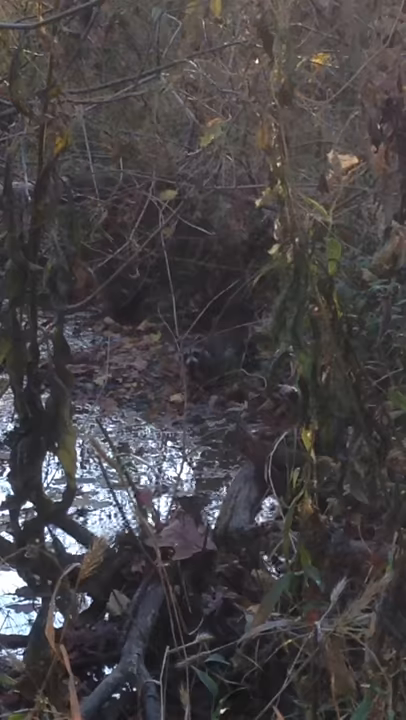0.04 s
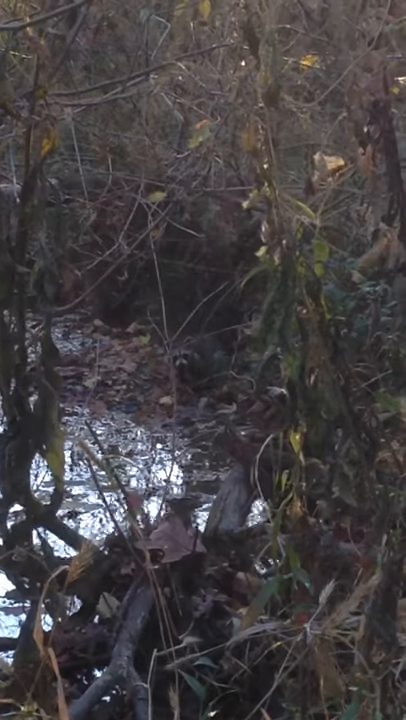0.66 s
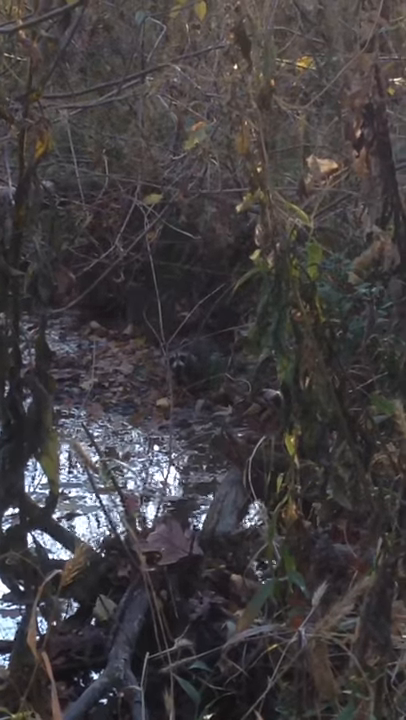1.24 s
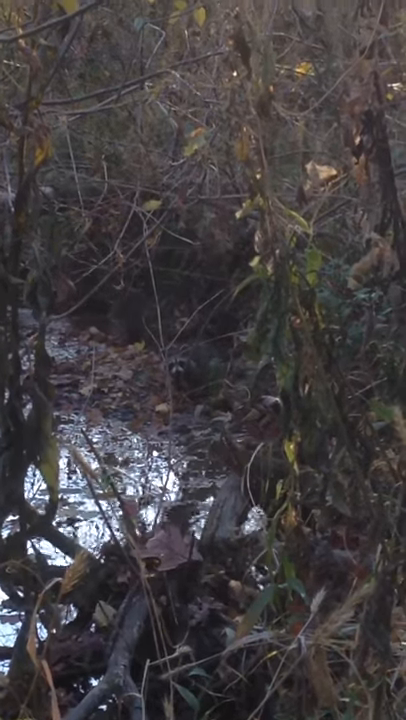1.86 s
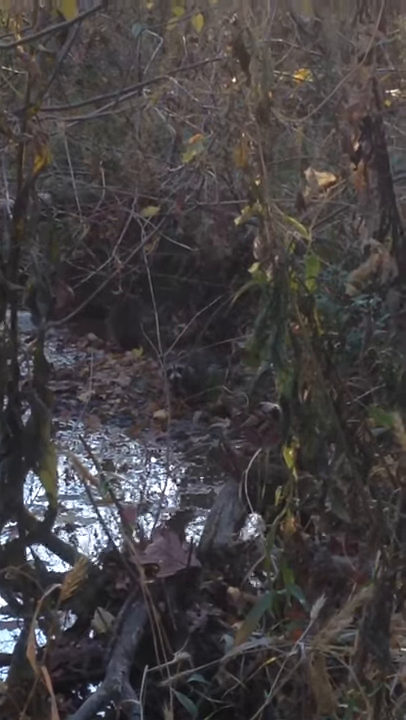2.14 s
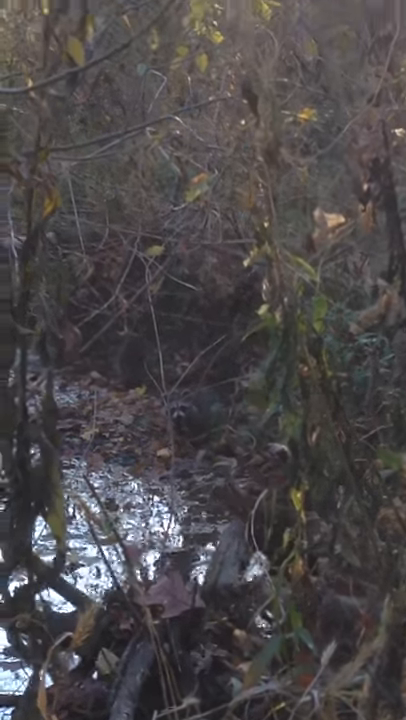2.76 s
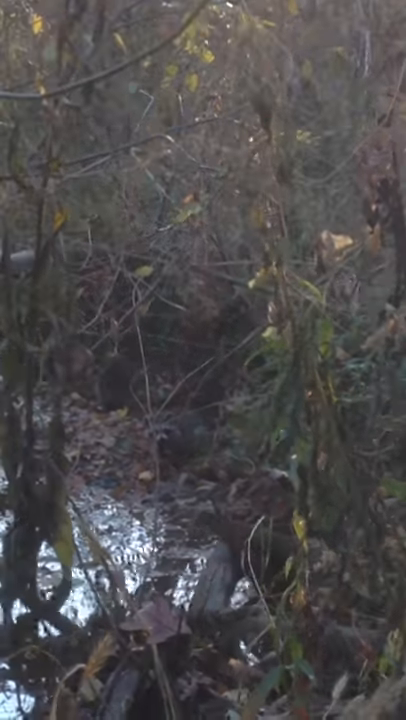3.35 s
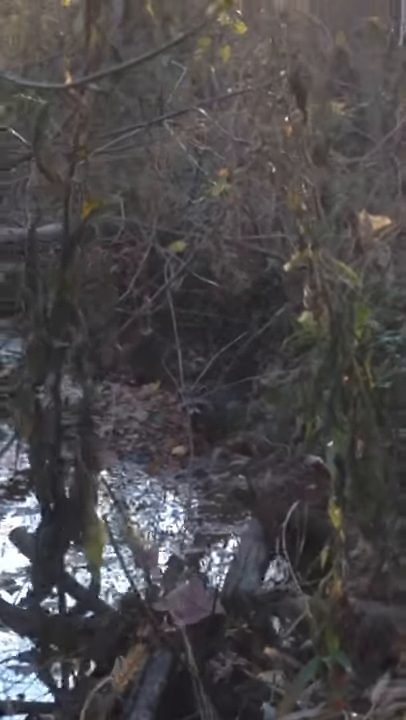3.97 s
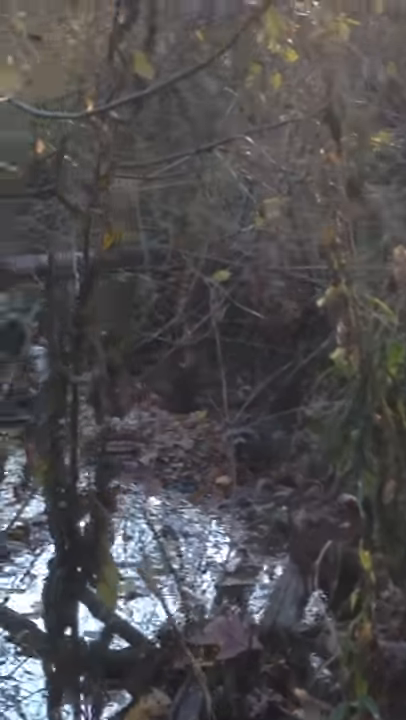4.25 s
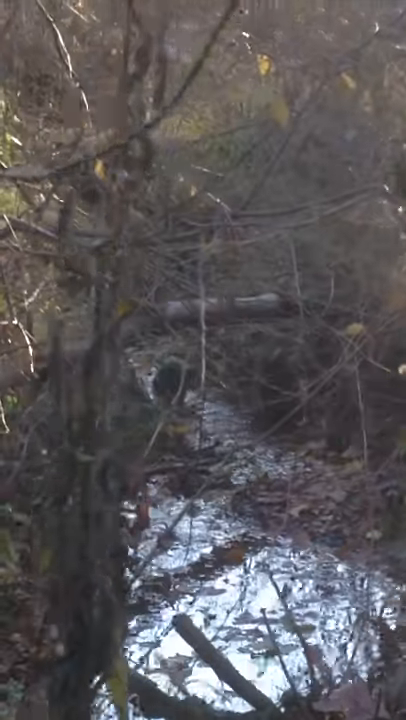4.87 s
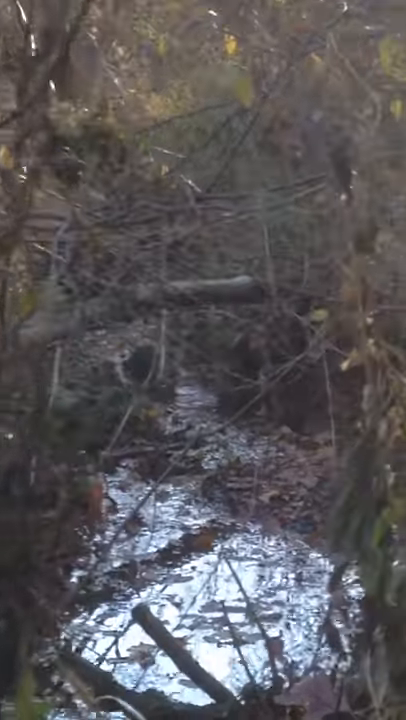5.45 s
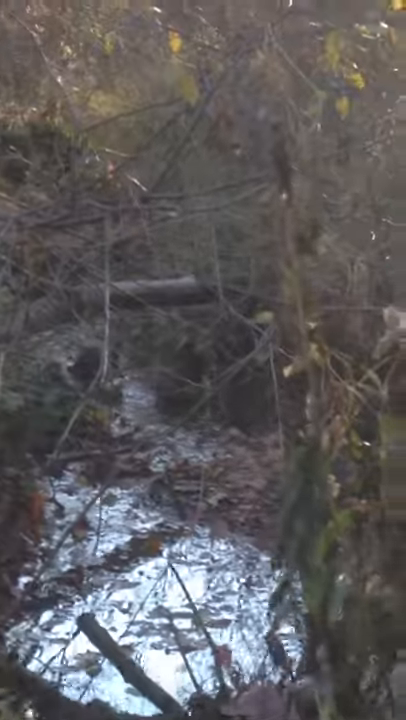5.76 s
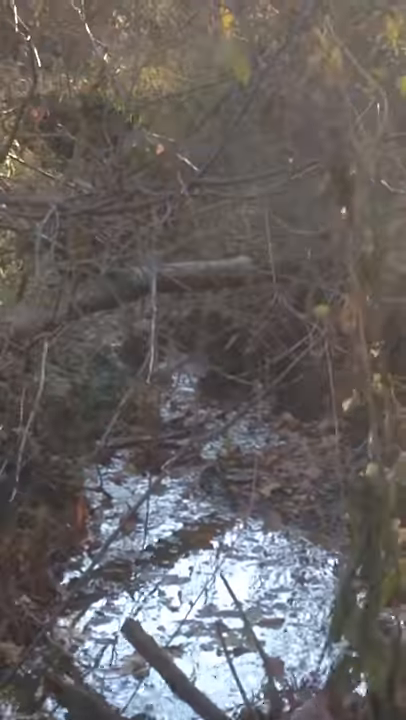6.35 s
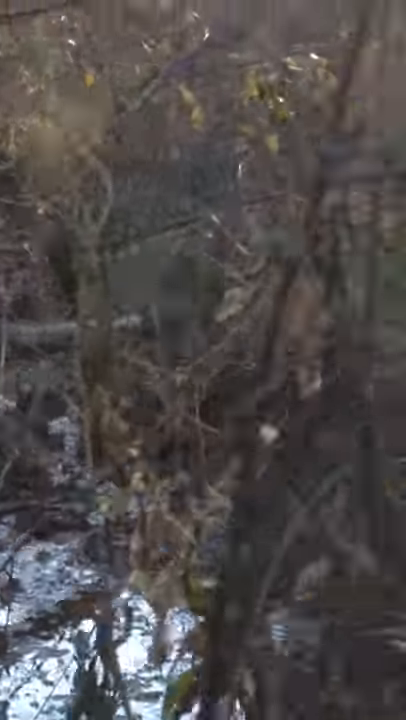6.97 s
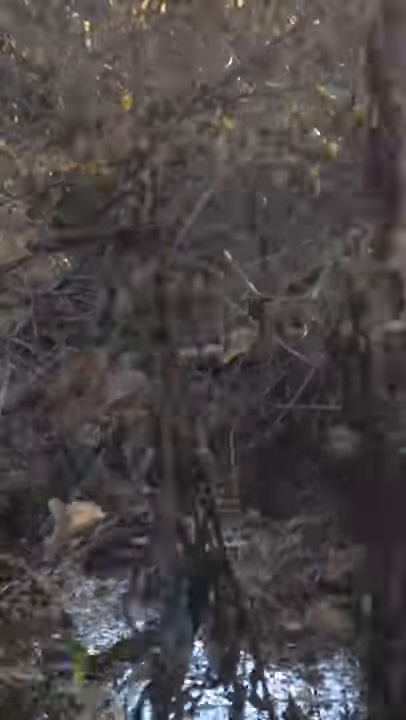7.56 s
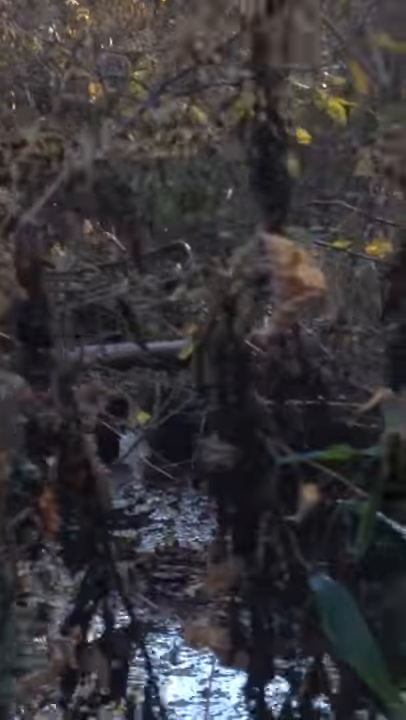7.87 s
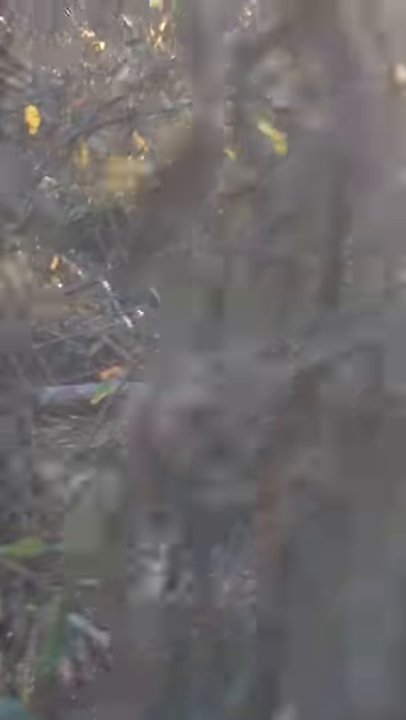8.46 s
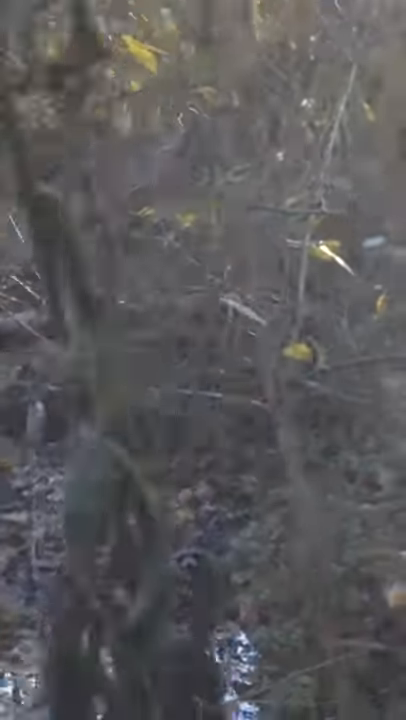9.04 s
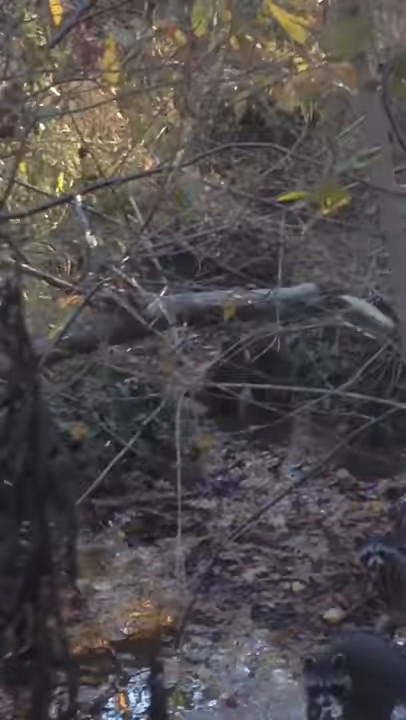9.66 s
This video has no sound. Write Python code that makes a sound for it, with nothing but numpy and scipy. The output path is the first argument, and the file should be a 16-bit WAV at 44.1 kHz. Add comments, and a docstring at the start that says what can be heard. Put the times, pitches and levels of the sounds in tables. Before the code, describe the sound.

Someone stands almost still by a woodland pool, with only slight rustling, distant bird whistles and a faint, fading motor hum. After a few seconds they push slowly through dry brush near the microphone: leaves crunch and swish, stalks scrape and twigs crack in clusters. Three high, widely spaced chipmunk chips cut through, and a soft rumble of far traffic lies underneath.

```python
"""Slow steps by a woodland pool

Someone stands by a pool, then walks through dry leaves and brush. Each step crushes litter, slides
leaves and drags stems; twigs snap, boots scrape stalks and knock on fallen wood. A chipmunk chips three
times, far birds whistle and one drop plops. Trunks and stems scatter the cracks and calls.
Under it all lie still air, far traffic and a fading motor hum, heard through one camera microphone."""
import sys
import numpy as np
from scipy import signal
from scipy.fft import rfft, irfft
from scipy.io import wavfile
from scipy.ndimage import map_coordinates

SR = 44100
rng = np.random.default_rng(int(sys.argv[2]) if len(sys.argv) > 2 else 0)


def wav_record(signal):
    """Record a signal, one row per channel, as 16-bit PCM in the file named by sys.argv[1]."""
    frames = np.transpose(np.atleast_2d(signal))
    bounded = np.clip(frames, -1, 1)
    # unit amplitude maps onto the largest positive 16-bit level
    quanta = np.round(bounded * 32767).astype(np.int16)
    wavfile.write(sys.argv[1], SR, quanta)


N = 428211

# Footfalls: start_s, rise_s, hold_s, fall_s (per 20 dB), litter_db, leaves_db, stems_db
FOOTFALLS = [(4.328, 0.11, 0.17, 0.44, -49.5, -50.5, -51), (5.76, .06, .18, 0.83, -55.5, -53.5, -54),
             (7.077, .14, 0.28, 0.26, -57, -54, -54), (8.182, 0.1, 0.37, 0.2, -57.5, -53, -53),
             (9.051, 0.093, 0.21, 0.25, -52, -48.5, -47), (9.486, 0.2, .1, .2, -57, -50, -52.5)]


def amp(db):
    """Decibels to gain."""
    return 10 ** (np.asarray(db) / 20)


def unit(x):
    """Scale to rms 1."""
    return x / np.sqrt(np.mean(x ** 2) + 1e-20)


def unit_peak(x):
    """Scale to peak 1."""
    return x / abs(x).max()


def clock(seconds):
    """Sample times of a short sound."""
    return np.arange(int(seconds * SR)) / SR


def curves(rows):
    """Automation: one value per sample for each column after the time."""
    times, *columns = np.transpose(rows)
    return [np.interp(np.arange(N) / SR, times, column) for column in columns]


def wobble(knots_per_s):
    """A smooth random curve."""
    knots = rng.standard_normal(int(N * knots_per_s / SR) + 4)
    return map_coordinates(knots, [np.arange(N) * knots_per_s / SR])


def swell(rise_s, hold_s, fall_s):
    """Envelope of one movement: it builds, holds, then drops 20 dB every fall_s."""
    t = clock(2)
    return np.minimum(t / rise_s, 1) * amp(-20 * np.maximum(t - (rise_s + hold_s), 0) / fall_s)


def add(track, start_s, sound):
    """Mix a sound into the track."""
    part = track[max(round(start_s * SR), 0):][:len(sound)]
    part += sound[:len(part)]


def colour(x, points, size=8192):
    """Minimum-phase EQ through (Hz, dB) points, so clicks keep their sharp fronts; rms 1."""
    hz, db = np.transpose(points)
    log_gain = np.log(amp(np.interp(np.log(np.fft.rfftfreq(size, 1 / SR) + 1), np.log(hz), db)))
    cepstrum = irfft(log_gain) * np.r_[1, np.full(size // 2 - 1, 2), np.zeros(size // 2)]
    impulse = irfft(np.exp(rfft(cepstrum)))
    return unit(signal.fftconvolve(x, impulse)[:len(x)])


def band(x, lo_hz, hi_hz, order=1):
    """A broad resonance between two edges."""
    edges = np.clip([lo_hz, hi_hz], 20, [SR / 3, SR / 2.1])
    return signal.sosfilt(signal.butter(order, edges, 'band', fs=SR, output='sos'), x)


def scatter(x, t60, wet_db):
    """Dense echoes from stems and trunks, wet only."""
    t = clock(t60)
    tail = rng.standard_normal(len(t)) * amp(-60 * t / t60) * (t > .001)
    return amp(wet_db) * signal.fftconvolve(x, tail / np.linalg.norm(tail))[:N]


def outdoor_bed():
    """Still woodland air, the rumble of far traffic and one engine that swells and recedes."""
    # Tone of the air: freq_hz, gain_db
    air_eq = [(25, -31.5), (70, 1), (170, 3), (260, -2.5), (350, -1), (600, -4.5), (1100, -6.5), (1800, -8),
              (2400, -5.5), (3400, -8.5), (4600, -9), (7000, -13.5), (10000, -18.5), (15500, -43)]
    # Tone of the traffic: freq_hz, gain_db
    traffic_eq = [(25, -32), (42, 1), (60, 7.5), (80, -17), (130, 2.5), (200, 0.5), (400, -20.5)]
    # Drone of the far engine: time_s, level_db
    drone = [(.1, -70.5), (.9, -66.5), (2, -76), (3.8, -73), (4.4, -64.5), (5.1, -68), (5.7, -73),
             (7.4, -76.5), (8.5, -71), (9.7, -77)]
    air = colour(rng.standard_normal(N), air_eq) * amp(-58.5 + .37 * wobble(2.9))
    traffic = colour(rng.standard_normal(N), traffic_eq) * amp(-69.5)
    engine = unit(band(rng.standard_normal(N), 87.0, 116.4, order=2)) * amp(curves(drone)[0])
    return air + traffic + engine


def far_motor():
    """A faint hum that sinks a little in pitch as it fades."""
    # Path of the hum: time_s, pitch_hz, level_db
    hum = [(.1, 323.6, -74), (.7, 324, -74.5), (1.3, 317, -74.5), (1.6, 320, -94)]
    hz, db = curves(hum)
    phase = 2 * np.pi * np.cumsum(hz * (1 + .0056 * wobble(12))) / SR
    return amp(db + 1.3 * wobble(6.7)) * unit(np.sin(phase))


def movements():
    """Envelopes for litter, leaves and stems: stirring, steps, swishes and flicks add up in power."""
    # Undergrowth that never quite rests, at the outset: litter_db, leaves_db, stems_db
    stir = (-75, -67.5, -73.5)
    # Legs and sleeves pushing through brush: start_s, rise_s, hold_s, litter_db, leaves_db, stems_db
    swishes = [(0.38, 0.037, 0.22, -84, -65, -70), (0.746, 0.1, 0.16, -71, -66, -68),
               (1.197, .1, 0.072, -70, -72, -78), (3.265, 0.023, 0.036, -64, -66, -60),
               (3.356, 0.04, 0.19, -66, -77, -79), (3.955, 0.065, 0.011, -55.5, -63, -65),
               (4.165, 0.0081, 0.014, -65, -53.5, -59), (4.212, 0.011, 0.058, -59, -53.5, -59),
               (4.818, 0.013, 0.11, -62, -55, -60.5), (5.104, 0.038, .1, -78, -58, -66),
               (5.262, 0.017, 0.056, -58.5, -61, -61.5), (5.361, 0.07, 0.015, -56, -53, -55),
               (5.504, 0.021, 0.36, -64, -57.5, -62), (6.297, 0.048, 0.017, -58.5, -61, -57),
               (6.526, 0.055, 0.017, -58, -55.5, -59), (6.69, 0.043, 0.011, -57, -55, -57),
               (6.805, 0.087, 0.12, -59, -56, -53.5), (7.706, 0.017, 0.0093, -59, -60, -60.5)]
    # Bent stalks springing free: start_s, hold_s, leaves_db, brightness_db (stems over leaves)
    flicks = [(5.95, 0.013, -53, -9), (7.533, .006, -51.5, 0), (8.28, .02, -53, 2), (8.385, .012, -50.5, 1),
              (8.455, .012, -50, 2), (8.532, .016, -52, 7), (8.645, .014, -52, 2), (9.273, 0.11, -53, 13)]
    stir_growth_db = .6 * np.arange(N) / SR  # more stirring as the walk gets under way
    power = amp(np.array(stir)[:, None] + stir_growth_db) ** 2
    moves = [(start, swell(rise, hold, fall), levels) for start, rise, hold, fall, *levels in FOOTFALLS]
    moves += [(start, swell(rise, hold, fall_s=.19), levels) for start, rise, hold, *levels in swishes]
    moves += [(start, swell(.013, hold, fall_s=.059), (db - 2.5, db, db + bright_db))
              for start, hold, db, bright_db in flicks]
    for start, envelope, levels in moves:
        for layer, db in zip(power, levels):
            add(layer, start, (amp(db) * envelope) ** 2)
    return np.sqrt(power)


def crackle(centre_hz, cycles, spread_db, clump_db, hiss_db, grains_per_s=1200, size=160):
    """Tiny leaf fractures, each a brief ring, coming in clumps over a sliding hiss."""
    when, pitch, force = np.hsplit(rng.random((int(grains_per_s * N / SR), 3)), 3)
    start = (when * (N - size)).astype(int)
    hz = np.minimum(centre_hz * 4 ** (2 * pitch - 1), SR / 2.2)
    strength = amp(spread_db * force ** 2)  # many faint, few strong
    turns = hz * np.arange(size) / SR
    grains = strength * np.sin(2 * np.pi * turns) * np.exp(-turns / cycles)
    ticks = unit(np.bincount((start + np.arange(size)).ravel(), grains.ravel(), N))
    return (ticks + amp(hiss_db) * rng.standard_normal(N)) * amp(clump_db * np.tanh(wobble(110)))


def rustle():
    """Weight crushes the litter, loose leaves slide, and dry stems brush past close by."""
    # Crunch of crushed litter: freq_hz, gain_db
    litter_eq = [(100, -55), (250, -16.5), (560, -14), (760, -5), (1030, -2.5), (1400, -0.5), (1900, 2),
                 (2600, -2), (4500, -9), (9000, -62)]
    # Swish of sliding leaves: freq_hz, gain_db
    leaves_eq = [(900, -23), (2000, -4.5), (2800, -2.5), (4200, -1), (5400, -2), (7000, -4.5),
                 (11000, -35.5)]
    # Sizzle of brushing stems: freq_hz, gain_db
    stems_eq = [(3000, -26), (6500, -10.5), (8300, -3.5), (10500, -5), (12800, -4.5), (15500, -10)]
    crush, slide, brush = movements()
    give = np.tanh(wobble(50))  # the leaf bed yields in jerks
    litter = crackle(centre_hz=1356, cycles=1.3, spread_db=23, clump_db=.7, hiss_db=1.5)
    leaves = crackle(centre_hz=3960, cycles=1.1, spread_db=23, clump_db=2, hiss_db=4.5)
    stems = crackle(centre_hz=7900, cycles=2.2, spread_db=17, clump_db=2.5, hiss_db=3)
    litter = colour(litter * amp(1.2 * give), litter_eq) * crush
    leaves = colour(leaves * amp(1.4 * give), leaves_eq) * slide
    stems = colour(stems * amp(1.7 * give), stems_eq) * brush
    return litter + leaves + stems


def scrapes(slips_per_s=220, spread_db=12, slip_t60_s=.004, hiss_share=.55):
    """A stalk catches and lets go in uneven slips, coloured by its own broad resonance."""
    # Boots and legs dragging along stalks and bark:
    # start_s, rise_s, hold_s, fall_s (per 20 dB), pitch_hz, width (band edge over centre), level_db
    drags = [(.7, .1, .12, 0.1, 2600, 1.3, -66), (1.151, .12, .12, .2, 2650, 1.25, -68),
             (4.5, 0.064, .04, .14, 1250, 1.4, -51), (5.785, .012, .025, .08, 4200, 1.04, -44.5),
             (5.83, .03, 0.098, 0.4, 4300, 1.17, -53), (6.84, .08, 0.33, .3, 1960, 1.4, -57),
             (7.37, .04, .04, 0.3, 5000, 1.25, -55.5), (9.2, .03, .04, 0.2, 1700, 1.4, -54)]
    out = np.zeros(N)
    slip_decay = amp(-60 * clock(.02) / slip_t60_s)
    for start, rise, hold, fall, hz, width, db in drags:
        envelope = swell(rise, hold, fall)
        chance, size = rng.random((2, len(envelope)))
        releases = (chance < slips_per_s / SR) * amp(spread_db * size)
        slips = signal.fftconvolve(releases, slip_decay)[:len(envelope)]
        friction = (unit(slips) + hiss_share) * rng.standard_normal(len(envelope))
        edge = max(width, 1.1)
        rub = band(friction, hz / edge, hz * edge, order=2)
        add(out, start, amp(db) * envelope * unit(rub))
    return out


def glides(rows, blur_share=1):
    """Quavering tones that swell, slide and fade; bend 1 slides straight, more levels off sooner."""
    out, quaver = np.zeros(N), blur_share * wobble(260)
    for start, length, from_hz, to_hz, db, bend, blur in rows:
        hz = to_hz + (from_hz - to_hz) * np.linspace(1, 0, len(clock(length))) ** bend
        hz = hz * (1 + blur * quaver[round(start * SR):][:len(hz)])
        tone = np.sin(2 * np.pi * np.cumsum(hz) / SR)
        add(out, start, amp(db) * signal.windows.tukey(len(hz), .6) * tone)
    return out


def far_birds():
    """Whistles from deep in the wood, blurred by echoes off the trunks; high echoes die first."""
    # Bird notes: start_s, length_s, from_hz, to_hz, send_db (into the echoes),
    # direct_db (relative to the send), bend, blur (share of the pitch)
    notes = [(.755, .097, 2390, 2600, -56, -12, 1.8, .05), (.827, .04, 1267, 1276, -55, -4, 1.8, .03),
             (.996, .07, 4000, 3920, -57, -10, 1.8, .01), (1.303, .11, 2890, 2425, -62, -14, 1.8, .07),
             (1.6, .08, 1200, 1340, -54, -5, 1.2, .045), (1.69, .17, 1750, 1300, -60.5, 0, 1.1, .03),
             (2.51, .11, 2800, 2250, -56, -16, 1.5, .08), (3.36, .055, 2650, 2440, -55, 0, 4, .015),
             (3.468, .075, 3100, 2220, -55.5, 3, 5, .018), (3.547, .026, 6950, 6820, -47.5, -5, 1.8, .006),
             (3.574, .027, 6700, 5250, -54, -1, 1.8, .015), (3.989, .062, 3100, 2430, -56, -1, 1.8, .03),
             (4.103, .047, 2620, 2500, -57.5, .5, 1.8, .03), (4.17, .06, 2950, 2400, -56, -2, 1, .05),
             (4.668, .06, 3100, 2600, -54, 0, 1, .03), (4.735, .05, 2480, 2350, -54, -2, 1.5, .04),
             (5.137, .059, 4300, 3200, -58, -14, 1.2, .09), (5.195, .06, 2850, 2330, -54.5, -1, 1.5, .07),
             (5.319, .06, 2420, 2150, -57.5, 2, 1, .03), (5.378, .04, 2520, 2380, -57, 3, 1.5, .02),
             (5.545, .054, 3960, 3960, -54, -5, 1.8, .012), (8.154, .09, 2070, 2450, -57, -6, 1.8, .05),
             (8.667, .047, 2240, 2200, -54, -6, 1.8, .03), (8.753, .084, 2210, 2307, -52.5, -3, 1.8, .03),
             (8.861, .04, 2400, 2540, -53, -8, 1.8, .03), (9.376, .04, 2420, 2330, -48, 1, 1.8, .02),
             (9.445, .06, 2320, 2380, -52, -5, 1.8, .025)]
    direct_notes = [(*note, db + direct_db, bend, blur) for *note, db, direct_db, bend, blur in notes]
    direct = glides(direct_notes, blur_share=.4)
    send = glides([(*note, db, bend, blur) for *note, db, _, bend, blur in notes])
    low, high = band(send, 600, 4800, order=4), band(send, 4800, 12000, order=4)
    return direct + scatter(low, t60=.65, wet_db=-3) + scatter(high, t60=.36, wet_db=-3)


def twig_snaps(jolt_db=13, jolt_at_s=.0006):
    """Fibres tear, the twig breaks with one sharp jolt and rings, and its last fibres crumble."""
    # Twigs and leaf ribs breaking: time_s, wood_peak_db, ring_hz, crack_peak_db, tear_t60_s
    snaps = [(0.932, -43, 5500, -41, .005), (2.946, -43, 2210, -39, .006), (3.241, -46, 4770, -34, .005),
             (3.293, -35.5, 1250, -42, .009), (3.297, -39, 3550, -29.5, .01), (3.638, -45, 1300, -40, .012),
             (3.668, -41, 1250, -48, .014), (4.44, -35, 4200, -42, .006), (4.445, -32, 2000, -42, .006),
             (4.464, -26, 1750, -34, .009), (4.505, -24.5, 1950, -32, .014), (4.513, -29, 3600, -35, .012),
             (4.514, -33, 1800, -44, .008), (4.567, -33, 1500, -35, 0.02), (4.589, -27, 1400, -37, .01),
             (4.599, -33, 1100, -42, .012), (4.648, -31.5, 5000, -36, .01), (4.695, -36, 1300, -34, .016),
             (4.723, -33.5, 1300, -39, .006), (4.768, -34, 4900, -33, .011), (4.769, -38, 1500, -44, .008),
             (4.833, -39.5, 1500, -39, .012), (5.003, -36.5, 3230, -46, 0.0083),
             (5.011, -36, 4360, -45, .006), (5.778, -34, 2600, -50, .006), (5.794, -29, 4060, -41, .004),
             (5.802, -26, 3960, -35, 0.0045), (5.816, -23.5, 4080, -36, 0.0024),
             (5.844, -34, 3600, -44, .003), (5.862, -40, 4470, -46, 0.0058), (5.904, -33, 3730, -40, .01),
             (5.969, -31.5, 3900, -42, 0.0045), (6.05, -35, 1300, -38, .006), (6.073, -29, 1300, -38, .012),
             (6.111, -33.5, 5570, -39, .02), (6.141, -32.5, 5270, -43, .004), (6.15, -29, 1750, -37, .007),
             (6.174, -37, 1100, -42, .006), (6.227, -35, 1490, -42, 0.0095),
             (6.281, -37, 4400, -48, 0.0044), (6.6, -42, 700, -44, 0.0048), (6.756, -41.5, 1000, -37, .006),
             (7.16, -27, 2600, -40, .01), (7.175, -35, 1800, -34, 0.0027), (7.206, -28, 2300, -35, .006),
             (7.214, -32, 4400, -29, 0.0065), (7.243, -27, 1400, -31, .014), (7.255, -29, 1900, -39, .007),
             (7.311, -29, 1120, -38, 0.0089), (7.316, -36, 1210, -36, 0.0077),
             (7.362, -36.5, 950, -38, .006), (7.388, -32, 5400, -40, .003), (7.407, -36, 3500, -25, .007),
             (7.44, -37, 4800, -41, .004), (7.449, -30, 2520, -41, .004), (8.308, -35, 2900, -35, .008),
             (8.32, -32.5, 1850, -37, .007), (8.339, -31.5, 1000, -29, .007), (8.403, -36, 2800, -38, .012),
             (8.454, -35, 2200, -43, .005), (8.462, -30, 5500, -29, .008), (8.545, -32, 1900, -38, .008),
             (8.604, -39, 850, -39, .0095), (8.666, -27.5, 2700, -30, .01), (8.702, -35, 5300, -44, .01),
             (8.713, -36, 2100, -48, .004), (8.731, -31.5, 1880, -46, 0.0081),
             (8.783, -29.5, 3800, -36, 0.011), (9.062, -39, 1700, -49.5, .014),
             (9.069, -36, 1550, -42, .021), (9.203, -36, 1750, -44, .007), (9.223, -32, 1550, -40, .014),
             (9.358, -34, 1150, -42, .01), (9.342, -36, 4500, -29, 0.0087), (9.364, -29, 4800, -22, .008),
             (9.377, -33, 4700, -23, .01), (9.392, -39, 6100, -24, .012), (9.542, -34, 4600, -32.5, .007),
             (9.553, -38, 1400, -46, .012), (9.612, -36, 4000, -42, .005)]
    out, t = np.zeros(N), clock(.05)
    jolt = amp(jolt_db) * (np.arange(len(t)) == round(jolt_at_s * SR))
    for when, wood_db, hz, crack_db, t60 in snaps:
        crumble = .15 * amp(-20 * t / (1.7 * t60))
        tear = rng.standard_normal(len(t)) * (amp(-60 * t / t60) + crumble)
        force = tear + jolt
        ring = unit_peak(band(force, hz / 1.25, hz * 1.25, order=2))
        splinter = unit_peak(band(force, 950, 5800, order=2))
        splinter_share = 1.45 * np.sqrt(1600 / hz)  # thin, high stalks break more cleanly
        wood = unit_peak(ring + splinter_share * splinter)
        crack_hz = rng.uniform(7000, 12000)
        crack = unit_peak(band(tear, crack_hz / 1.35, crack_hz * 1.33))
        add(out, when - jolt_at_s, amp(wood_db) * wood + amp(crack_db) * crack)
    return out


def chipmunk(bounce_s=.000376, bounce_share=.33, flutter_db=2.5):
    """Each chip arches high, plunges two octaves, bounces off the ground and scatters in the brush."""
    # The calls: start_s, level_db
    chips = [(1.908, -36.5), (4.366, -36.5), (7.886, -36.5)]
    # Pitch contour within a chip: time_s, pitch_hz
    contour = [(0, 12300), (.008, 12800), (.016, 12200), (.022, 10000), (.028, 7900), (.036, 5500),
               (.047, 3200)]
    out, t = np.zeros(N), clock(.0477)
    hz = np.interp(t, *np.transpose(contour))
    attack = np.sqrt(np.minimum(t / .016, 1))
    release = amp(-1200 * np.maximum(t - .038, 0))
    phase = 2 * np.pi * np.cumsum(hz) / SR
    bounce = bounce_share * np.sin(phase - 2 * np.pi * hz * bounce_s)
    chip = attack * release * (np.sin(phase) + bounce) * signal.windows.tukey(len(t), .08)
    for start, db in chips:
        add(out, start, amp(db) * chip)
    out *= amp(flutter_db * np.tanh(wobble(500)))  # echoes off nearby branches make the level flicker within each chip
    duller = band(out, 6200, 11500, order=2)  # leaves soak up the top of the far echoes
    return out + scatter(out, t60=.2, wet_db=-5.5) + scatter(duller, t60=.45, wet_db=-14.5)


def drip():
    """A drop falls into the pool and its bubble rings for an instant."""
    # The bubble: start_s, length_s, from_hz, to_hz, level_db, bend, blur (share of the pitch)
    bubble = [(2.733, .013, 706, 800, -47, 1.8, 0)]
    plop = glides(bubble)
    return plop + scatter(plop, t60=.14, wet_db=-10)


def boot_knocks():
    """A boot meets something solid under the leaves, which answers in one broad resonance."""
    # Hits on fallen wood and stalks: start_s, peak_db, pitch_hz, t60_s, width (band edge over centre)
    hits = [(3.745, -46.5, 1640, .08, 1.23), (4.03, -35.5, 1440, .034, 1.31), (4.468, -41, 1020, .06, 1.3),
            (4.514, -40, 1200, .2, 1.45), (4.573, -35, 1100, .16, 1.35), (5.949, -41.5, 980, .036, 1.3),
            (7.311, -35, 1100, .035, 1.22), (8.338, -37, 340, .009, 1.7), (8.467, -42, 900, .25, 1.42),
            (8.527, -38.5, 800, .12, 1.45), (9.14, -43, 700, .07, 1.45), (9.238, -43.5, 1300, .1, 1.1),
            (9.357, -43, 430, .03, 1.9)]
    out, t = np.zeros(N), clock(.23)
    for start, db, hz, t60, width in hits:
        burst = rng.standard_normal(len(t)) * amp(-60 * t / t60)
        thud = band(burst, hz / width, hz * width, order=2)
        add(out, start, amp(db) * unit_peak(thud))
    return out


def leaf_breaks(breaks_per_s=90, spread_db=11, against_leaves_db=-4.5):
    """Single dry leaves give way under the boot, each with a short tick at its own pitch."""
    ticks, t = np.zeros(N), clock(.012)
    for when, pitch, size in rng.random((int(breaks_per_s * N / SR), 3)):
        hz = 1300 * 10 ** pitch
        burst = rng.standard_normal(len(t)) * amp(-60 * t / .003)
        tick = unit(band(burst, hz / 1.5, hz * 1.5))
        add(ticks, when * N / SR, amp(spread_db * size) * tick)
    load = np.zeros(N)
    for start, rise, hold, fall, _, leaves_db, _ in FOOTFALLS:
        add(load, start, amp(leaves_db) * swell(rise, hold, fall))
    return amp(against_leaves_db) * load * unit(ticks)


def scene():
    """Everything reaches one microphone, heard alike on both sides."""
    cracks = twig_snaps() + leaf_breaks() + boot_knocks()
    echoes = scatter(cracks, t60=.2, wet_db=-11)
    walk = rustle() + scrapes() + cracks + echoes
    mono = walk + chipmunk() + far_birds() + drip() + far_motor() + outdoor_bed()
    return np.array([mono, mono])


def record(dry):
    """The camera keeps nothing above its band limit and opens its input a moment late."""
    top_hz, opens_s = 15500, .083
    limited = irfft(rfft(dry) * (np.fft.rfftfreq(N, 1 / SR) < top_hz), N)
    return limited * (np.arange(N) / SR > opens_s)


dry = scene()
out = record(dry)
wav_record(out)
```